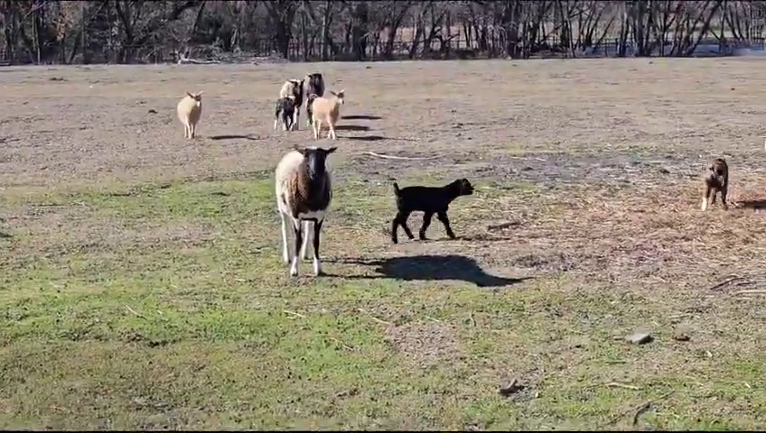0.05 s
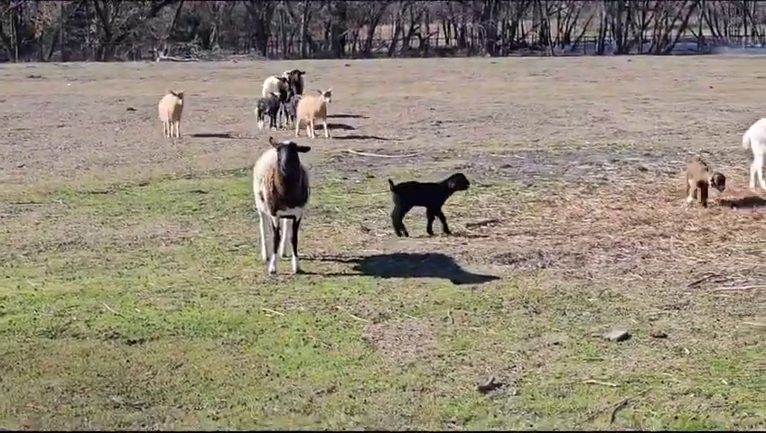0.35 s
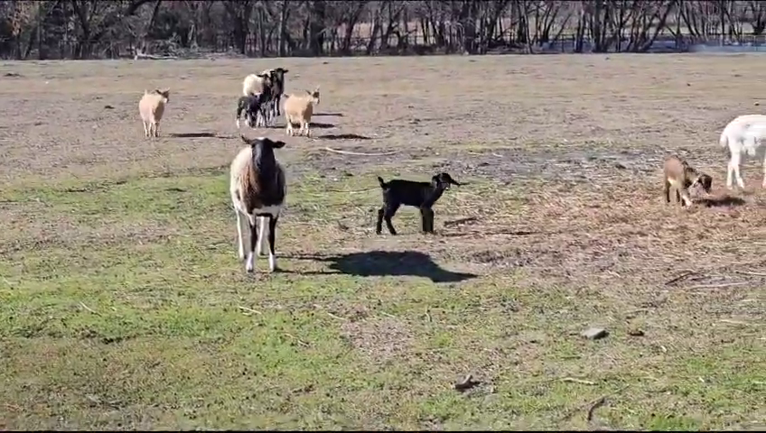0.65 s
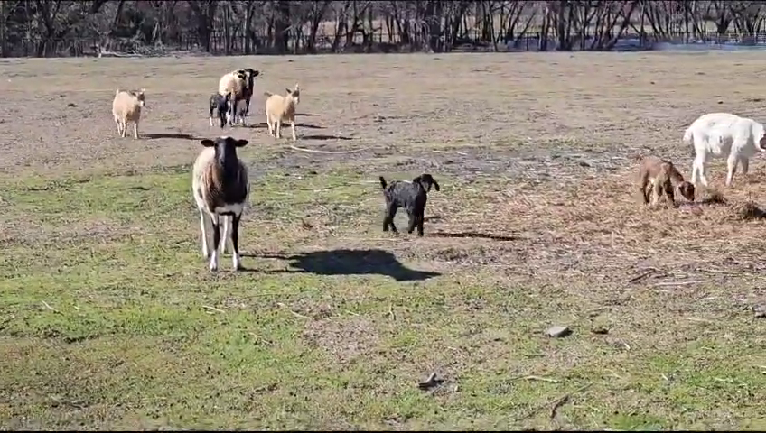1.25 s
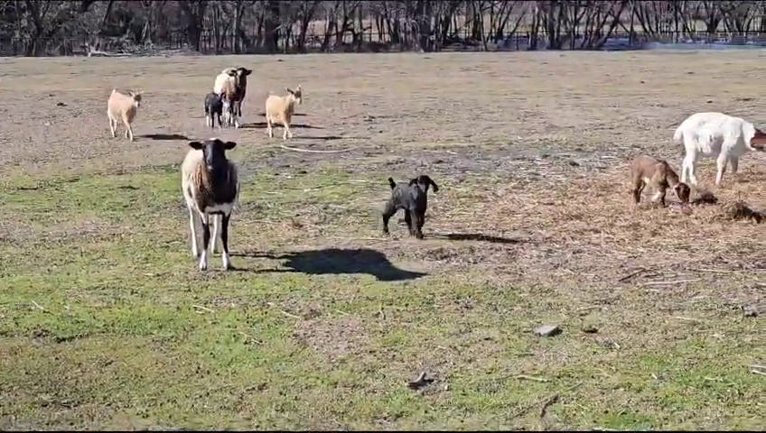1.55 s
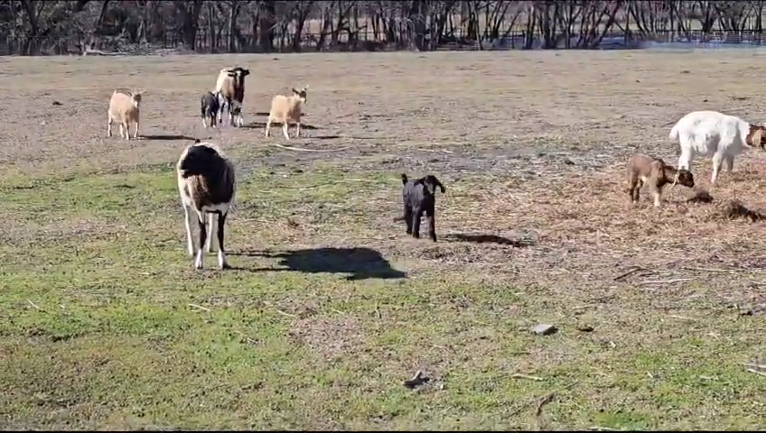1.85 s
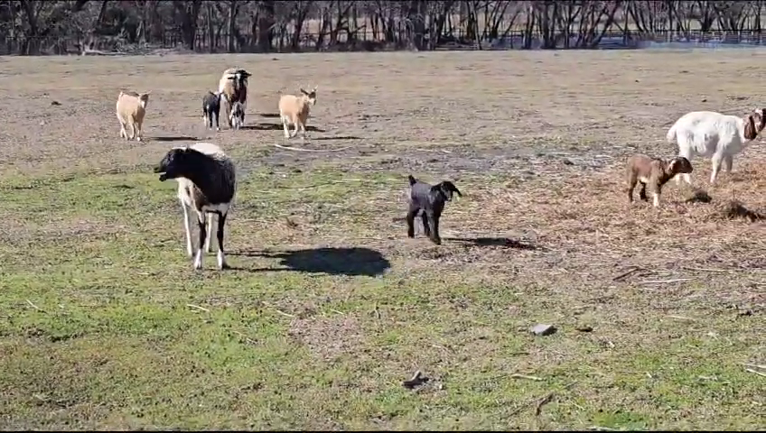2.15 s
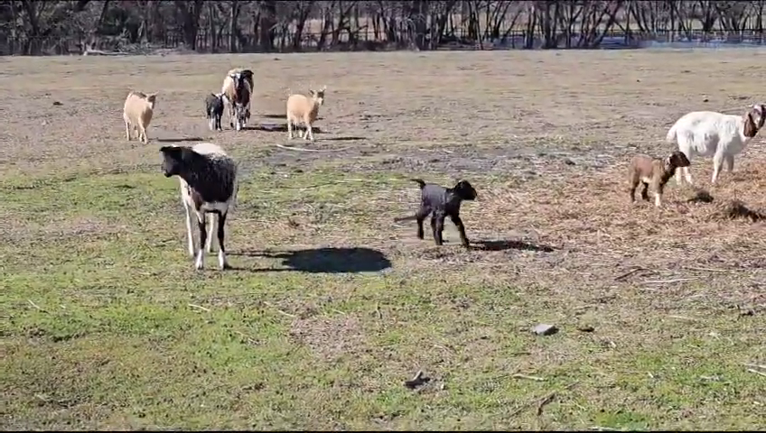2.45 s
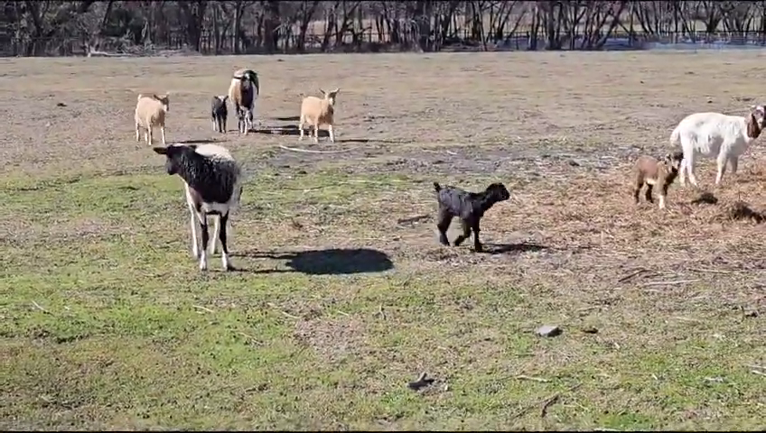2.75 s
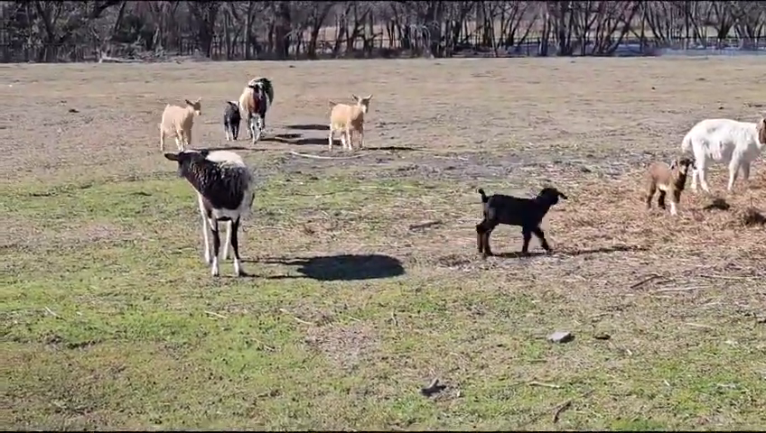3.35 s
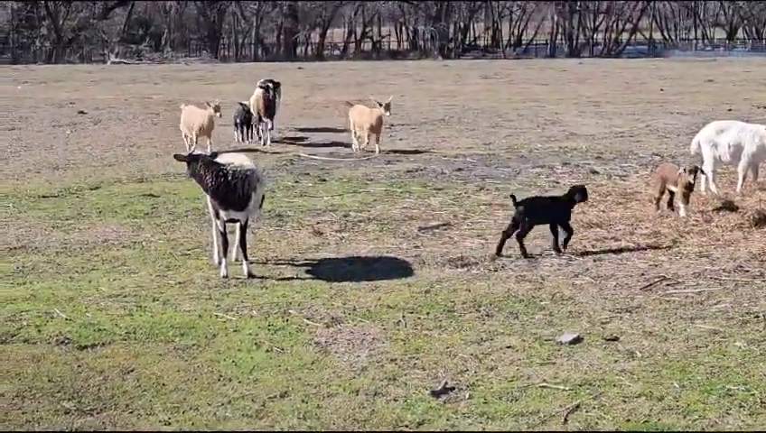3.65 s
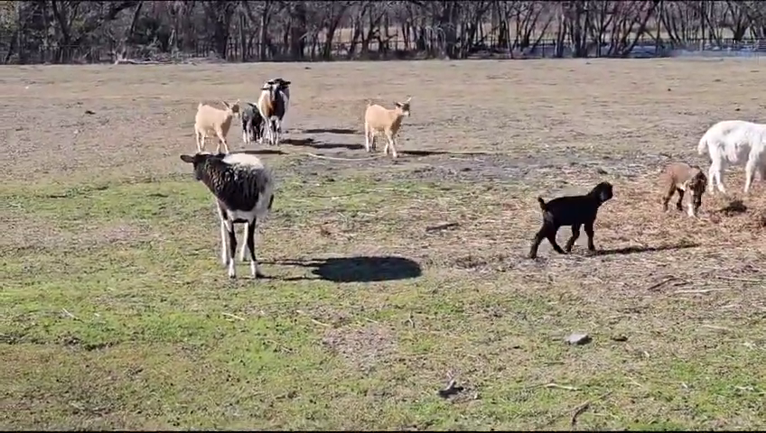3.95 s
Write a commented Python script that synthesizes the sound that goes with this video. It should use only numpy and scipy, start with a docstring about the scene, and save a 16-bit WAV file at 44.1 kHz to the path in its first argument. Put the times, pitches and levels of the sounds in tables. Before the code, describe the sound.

Lambs and a goat kid bleat around a ewe's long call, with wind rumbling.

```python
"""A lamb's level call comes first, over wind rumbling on the microphone and dry grass rustling.
More calls follow in the open pasture, one thin, two quavering; stalks tick. From 1.46 s a ewe gives
one long, buzzing bleat, closing her mouth as she runs out of air. A goat kid quavers last.
Each voice is vocal-fold pulses and breath puffs through throat resonances.
Wind and grass are shaped noise."""
import sys
import numpy as np
from scipy import signal
from scipy.fft import rfft, irfft, next_fast_len
from scipy.io import wavfile
from scipy.ndimage import uniform_filter1d, map_coordinates

SR = 44100
rng = np.random.default_rng(int(sys.argv[2]) if len(sys.argv) > 2 else 0)


def transcribe(signal):
    """Save signal, clipped to [-1, 1], as a 16-bit WAV file at the path in sys.argv[1]."""
    frames = np.atleast_2d(signal).T
    limited = np.clip(frames, -1, 1)
    pcm = np.round(limited * 32767).astype(np.int16)
    wavfile.write(sys.argv[1], SR, pcm)


N = 176400

# ewe's bleat (time [s], pitch [Hz], level [dB])
EWE_BLEAT = [(1.46, 120, -45.5), (1.479, 152.1, -31), (1.518, 154.5, -32.5), (1.56, 178.1, -23),
             (1.602, 186.8, -23.5), (1.667, 197, -25), (1.869, 197.2, -23), (1.977, 198.9, -25.5),
             (2.128, 196.2, -25), (2.4, 185.2, -27), (2.548, 167.8, -32), (2.677, 179.2, -32.5),
             (2.8, 169.6, -33), (2.82, 166.1, -36.5), (3.069, 159.3, -36), (3.197, 171.8, -37.5),
             (3.269, 166.8, -38), (3.35, 165.6, -59.5)]
# her lowest throat resonance (time [s], level [dB])
EWE_RESONANCE = [(1.5, -40), (1.65, -23), (1.75, -19), (1.87, -19), (1.94, -23), (2.08, -20.5),
                 (2.55, -50.5)]
# her mouth (time [s], closing [0 wide, 1 half, 2 nearly shut], roughness [0-1])
EWE_MOUTH = [(1.48, 0.49, 0.29), (1.65, 0.27, 0.076), (1.82, 0.35, 0.06), (2.1, 1.03, 0.014),
             (2.82, 1.76, 0.12)]
# her throat, mouth wide, half open, nearly shut (frequency [Hz], gain [dB])
THROAT_WIDE = [(600, -22), (1250, -2), (1750, 8.5), (1980, -7), (2370, 13), (3200, -34), (3800, -0.5),
               (4900, -30), (8200, -16.5), (10300, -50), (13600, -24), (15500, -97.5)]
THROAT_HALF = [(580, -23), (950, -1), (1750, 2.5), (1980, -7.5), (2920, 4), (3250, -38.5), (3900, -17.5),
               (6000, -26.5), (7200, -28.5), (9300, -30), (10500, -50)]
THROAT_SHUT = [(1050, -16.5), (1740, 10), (2150, -22.5), (2850, -5), (3600, -18), (6100, -32),
               (7700, -46.5), (10100, -100)]
# lambs' held calls (time [s], pitch [Hz], level [dB])
LEVEL_CALL = [(0, 457, -43), (.045, 472.6, -45.5), (.175, 433.6, -44.5), (.225, 470.3, -38),
              (.29, 445.3, -40), (.33, 466, -37.5), (.38, 439, -39), (.62, 430, -41)]
THIN_CALL = [(.63, 342.8, -37), (.7, 340, -41), (.84, 333, -46.5), (1.04, 357, -47.5), (1.21, 364, -53)]
# quavering bleats, one row per shake (time [s], top pitch [Hz], level [dB])
FIRST_QUAVER = [(.394, 526, -36.5), (.493, 548, -33.5), (.594, 542, -32), (.697, 512.4, -36.5),
                (.8, 446.7, -37)]
SECOND_QUAVER = [(2.008, 521.6, -30), (2.097, 499, -33), (2.192, 490, -34.5), (2.293, 466.8, -30),
                 (2.385, 470.6, -31), (2.482, 472.8, -32.5), (2.595, 447.6, -36), (2.686, 431.2, -37)]
KID_QUAVER = [(3.6, 519, -44.5), (3.688, 566, -29.5), (3.782, 582, -27), (3.877, 585, -27),
              (3.977, 571.4, -27.5)]
# young throats (frequency [Hz], gain [dB])
LAMB_THROAT = [(950, -6.5), (1350, 12), (1600, -18.5), (1900, 6.5), (2500, -10.5), (3200, 0), (4600, -4),
               (7500, -21), (11500, -32)]
THIN_THROAT = [(1400, -11), (2400, -30.5), (3250, -1), (4600, -18), (15000, -46)]
KID_THROAT = [(560, -15.5), (1720, -8.5), (2150, -35), (2850, 2), (3450, -9), (4550, -5.5), (5350, -25.5),
              (6350, -10), (12500, -26), (14800, -21.5)]
# gust peaks, rustle envelope, stalk ticks (time [s], level [dB])
GUSTS = [(.44, -32.5), (1.021, -28), (1.678, -22.5), (2.102, -26.5), (2.449, -24)]
RUSTLE = [(0, -40), (.25, -34.5), (1.17, -46), (1.24, -25), (1.42, -49), (3.6, -50)]
TICKS = [(1.205, -36.5), (1.357, -39.5)]
# noise spectra (frequency [Hz], gain [dB])
RUMBLE_SPECTRUM = [(25, -2), (60, 3), (110, -10), (6000, -110)]
AIR_SPECTRUM = [(350, -1), (800, 4), (2500, -21.5), (15000, -46.5)]
RUSTLE_SPECTRUM = [(210, 2), (420, -6.5), (1300, -26), (12000, -56)]
TICK_SPECTRUM = [(1200, 0), (14000, -46)]
# stereo side relative to mid (frequency [Hz], gain [dB])
VOICE_SIDE = [(800, -14.5), (2300, -6), (4500, 4), (14000, -3)]
NOISE_SIDE = [(40, -24), (4000, -3.5)]
# voices' side relative to mid (frequency [Hz], phase [rad])
SIDE_PHASE = [(1300, 1.24), (2300, 2.13), (5000, 2.18), (9000, 1.52)]

RESONANCE_HZ, RESONANCE_WIDTH_HZ = 794.5, 62
SHAKE_S, YOUNG_JITTER = 0.1, 0.0071  # jitter: fraction of pitch
RUMBLE_DB, AIR_DB, GUST_HALF_WIDTH_S = -32.5, -43.5, 0.035
TICK_T60_S = 0.045
TOP_HZ = 15700
TIME_S = np.arange(N) / SR


def ewe():
    """Sharp pulses through a closing mouth; a low resonance sings on the fourth harmonic."""
    def resonance(hz):
        damping = 1j * hz * RESONANCE_WIDTH_HZ
        return (damping / (RESONANCE_HZ ** 2 - hz ** 2 + damping)) ** 2

    pitch_hz, level_db = curves(EWE_BLEAT)
    closing, rough = curves(EWE_MOUTH)
    source = vocal_folds(pitch_hz, rough / 2, jitter=rough / 10)
    cycles = np.cumsum(pitch_hz) / SR
    # creak: every second pulse weakens
    source *= 1 - np.clip(2 * rough, 0, 1) * np.sin(np.pi * cycles / 2) ** 2
    mouth = sum(np.clip(1 - abs(closing - k), 0, 1) * unit_rms(resonate(source, throat))
                for k, throat in enumerate([THROAT_WIDE, THROAT_HALF, THROAT_SHUT]))
    voice = amp(level_db + 16.8 * rough * wobble(35.38)) * steady(mouth)
    voice += amp(curves(EWE_RESONANCE)[0]) * steady(filtered(source, resonance))
    return in_pasture(voice * gate(EWE_BLEAT))


def young():
    """Four lamb calls, then the goat kid."""
    voices = held_call(LEVEL_CALL, LAMB_THROAT, rough=0.0078)
    voices += held_call(THIN_CALL, THIN_THROAT, rough=0.18)
    for shakes in (FIRST_QUAVER, SECOND_QUAVER):
        voices += quaver(shakes, LAMB_THROAT, sag=0.075, dip_db=10, rough=0.051)
    voices += quaver(KID_QUAVER, KID_THROAT, sag=0.064, dip_db=13, rough=0.0077)
    return in_pasture(voices)


def held_call(rows, throat, rough):
    """Fold pulses through an unchanging throat; the level flutters."""
    pitch_hz, level_db = curves(rows)
    voice = steady(resonate(vocal_folds(pitch_hz, rough, YOUNG_JITTER), throat))
    return voice * amp(level_db + 3.8 * wobble(30.7)) * gate(rows)


def quaver(shakes, throat, sag, dip_db, rough):
    """Shaken bleat: between shakes the pitch sags and the voice turns weak and rough."""
    times_s = [row[0] for row in shakes]
    times_s = [times_s[0] - SHAKE_S, *times_s, times_s[-1] + SHAKE_S]
    turn = np.interp(TIME_S, times_s, np.arange(len(times_s)))
    slack = np.sin(np.pi * turn) ** 2  # 0 on a shake, 1 between
    fade = np.clip(2 * np.minimum(turn, len(times_s) - 1 - turn) - 1, 0, 1) ** 0.5
    top_pitch_hz, level_db = curves(shakes)
    pitch_hz = top_pitch_hz * (1 - sag * (slack + 1 - fade))
    source = vocal_folds(pitch_hz, rough * (1 + 2 * slack), YOUNG_JITTER)
    return steady(resonate(source, throat)) * amp(level_db - dip_db * slack) * fade


def vocal_folds(pitch_hz, rough, jitter, spread_db=0.75):
    """One band-limited pulse per cycle, then a noise puff; rough is the puffs' share of power."""
    cycles = np.cumsum(pitch_hz * (1 + jitter * wobble(170))) / SR
    centres = np.interp(np.arange(1, int(cycles[-1])), cycles, np.arange(N))
    taps = centres.astype(int)[:, None] + np.arange(-7, 9)
    offsets = taps - centres[:, None]
    shape = np.sinc(offsets) * np.cos(np.pi * offsets / 16) ** 2
    sizes = amp(spread_db * rng.standard_normal(N)[:len(centres), None])
    pulses = np.bincount(np.clip(taps, 0, N - 1).ravel(), (shape * sizes).ravel(), N)
    puffs = rng.standard_normal(N) * np.exp(-2 * (cycles % 1))
    return np.sqrt(1 - rough) * steady(pulses - pulses.mean()) + np.sqrt(rough) * unit_rms(puffs)


def resonate(source, throat):
    """Throat ringing after each pulse: a minimum-phase filter."""
    def response(hz):
        cepstrum = irfft(np.log(amp(log_interp(throat, hz))))
        half = len(cepstrum) // 2
        cepstrum[1:half] *= 2
        cepstrum[half + 1:] = 0
        return np.exp(rfft(cepstrum))
    return filtered(source, response)


def in_pasture(voice, scatter_db=-14, scatter_t60_s=0.029):
    """Voice in stereo, with brief scatter from the ground."""
    side = filtered(voice, lambda hz: amp(log_interp(VOICE_SIDE, hz))
                    * np.exp(1j * log_interp(SIDE_PHASE, hz)))
    pair = np.array([voice + side, voice - side])
    tail_s = TIME_S[:SR // 10]
    tail = rng.standard_normal((2, len(tail_s))) * amp(-60 * tail_s / scatter_t60_s)
    tail /= np.linalg.norm(tail[0])
    return pair + amp(scatter_db) * signal.fftconvolve(pair, tail, axes=1)[:, :N]


def wind():
    """Short gusts buffet the microphone over steady rumble and a faint hush of open air."""
    gusts = sum(amp(db) * np.exp(-((TIME_S - at_s) / GUST_HALF_WIDTH_S) ** 2) for at_s, db in GUSTS)
    strength = amp(RUMBLE_DB + 0.27 * wobble(5.96)) + gusts
    rumble = stereo_noise(RUMBLE_SPECTRUM)
    rumble /= np.sqrt(np.abs(uniform_filter1d(rumble[0] ** 2, SR // 10)) + 1e-9)
    return strength * rumble + amp(AIR_DB) * stereo_noise(AIR_SPECTRUM)


def grass():
    """Uneven rustle of grass and clothing; two dry stalks tick."""
    rustle = amp(curves(RUSTLE)[0] + 4 * wobble(110)) * stereo_noise(RUSTLE_SPECTRUM)
    decays = sum(amp(db - 60 * np.abs(TIME_S - at_s) / TICK_T60_S) * (TIME_S >= at_s)
                 for at_s, db in TICKS)
    return rustle + decays * stereo_noise(TICK_SPECTRUM)


def stereo_noise(spectrum):
    """Shaped noise, rms 1, nearly mono in the bass."""
    def response(hz):
        return amp(log_interp(spectrum, hz)) * [np.ones_like(hz), amp(log_interp(NOISE_SIDE, hz))]
    mid, side = filtered(rng.standard_normal((2, N)), response)
    return unit_rms(np.array([mid + side, mid - side]))


def amp(db):
    """Decibels to gain."""
    return 10 ** (np.asarray(db) / 20)


def unit_rms(x):
    """Scale to rms 1."""
    return x / np.sqrt(np.mean(x ** 2) + 1e-20)


def steady(x):
    """Hold rms near 1 over any 50 ms."""
    return x / np.sqrt(np.abs(uniform_filter1d(x * x, SR // 20)) + 1e-12)


def log_interp(points, hz):
    """Interpolate on a log frequency axis."""
    knots_hz, values = np.transpose(points)
    return np.interp(np.log(hz + 1), np.log(knots_hz + 1), values)


def curves(rows):
    """Per-sample curve for each column after time."""
    times_s, *columns = np.transpose(rows)
    return [np.interp(TIME_S, times_s, column) for column in columns]


def gate(rows):
    """1 from first row to last, 10 ms edges."""
    on = (TIME_S >= rows[0][0]) & (TIME_S < rows[-1][0])
    return uniform_filter1d(on.astype(float), SR // 100)


def wobble(rate_hz):
    """Smooth random curve, rate_hz knots a second."""
    return map_coordinates(rng.standard_normal(N + 4), [TIME_S * rate_hz], order=3, mode="mirror")


def filtered(x, response):
    """Apply a complex frequency response."""
    size = 2 * next_fast_len(N // 2 + SR // 8)
    return irfft(rfft(x, size) * response(np.fft.rfftfreq(size, 1 / SR)), size)[..., :N]


def scene():
    """Flock, wind and grass in the open."""
    return ewe() + young() + wind() + grass()


def record(dry):
    """Brick-wall low-pass at TOP_HZ."""
    return filtered(dry, lambda hz: hz < TOP_HZ)


dry = scene()
out = record(dry)
transcribe(out)
```